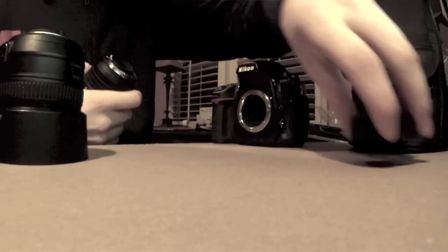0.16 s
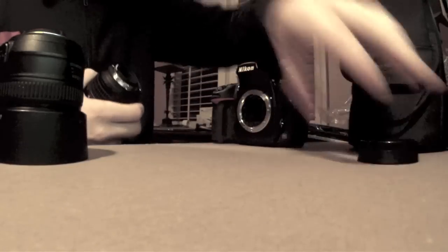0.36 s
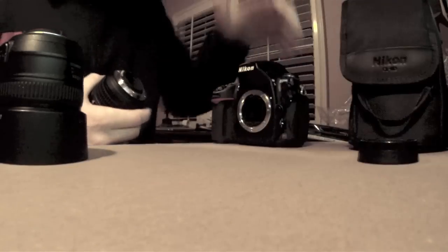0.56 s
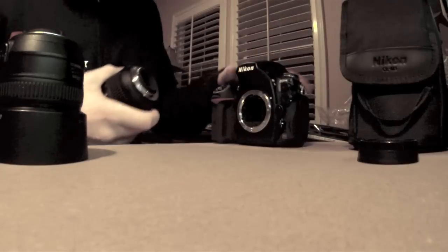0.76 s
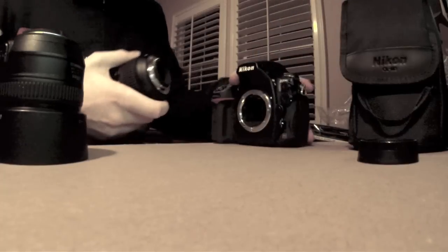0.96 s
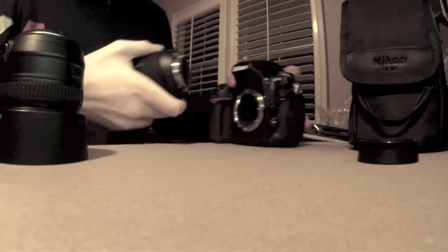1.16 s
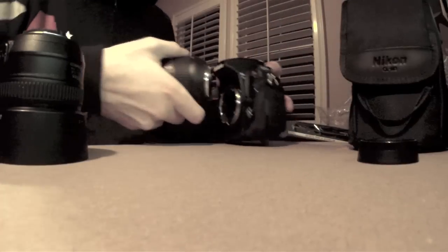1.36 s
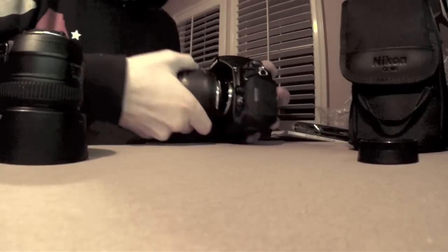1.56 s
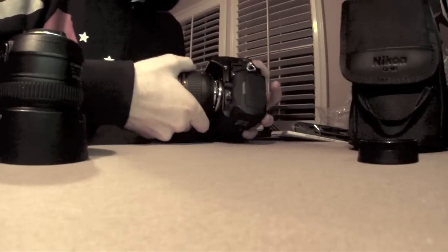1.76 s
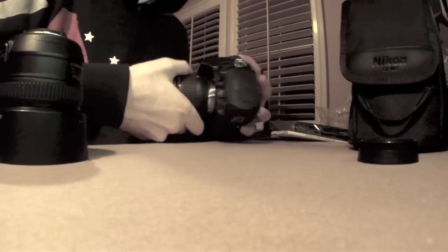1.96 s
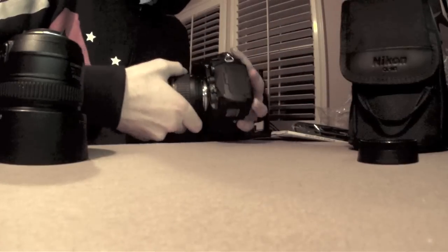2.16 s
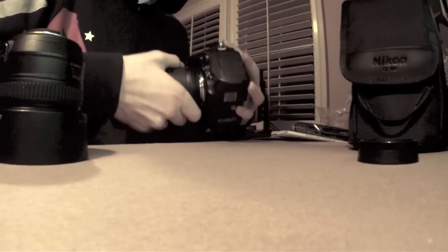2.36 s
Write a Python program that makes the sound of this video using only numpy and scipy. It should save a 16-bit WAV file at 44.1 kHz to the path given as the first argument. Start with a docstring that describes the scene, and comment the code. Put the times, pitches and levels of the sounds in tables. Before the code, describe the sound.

Camera handling: a plastic cap clacks sharply onto a desk with a brief ringing rim, hands rustle faintly, then a lens knocks, slides and clunks into place, close up in a small room with low-grade, gritty sound.

```python
"""Cap on a desk, lens into a camera

A plastic cap clatters down on a desk, its rim ringing; hands rustle, then a lens is knocked, slid and locked home.
Hits are decaying modes plus noise snaps; the rustle and slides are clumped grit over a desk rumble.
A small room answers the hits with sparse decaying taps; hum, hiss and low noise lie underneath.
The recorder samples at a low rate and holds each sample, which mirrors the sound into the treble.
"""
import sys
import numpy as np
from scipy import signal
from scipy.fft import rfft, irfft
from scipy.io import wavfile
from scipy.ndimage import uniform_filter1d

SR = 44100
rng = np.random.default_rng(int(sys.argv[2]) if len(sys.argv) > 2 else 0)


def gain_from_decibels(decibels):
    """Convert decibel values to linear amplitude factors."""
    exponent = np.asarray(decibels, float) / 20
    return 10 ** exponent


def digitize_waveform(pressure):
    """Quantize a signal to 16-bit integers and store it at the path in sys.argv[1].

    Rows of a 2-D input are taken as channels; values are limited to [-1, 1].
    """
    field = np.atleast_2d(pressure).T
    bounded = np.clip(field, -1, 1)
    quanta = np.round(bounded * 32767).astype(np.int16)
    wavfile.write(sys.argv[1], SR, quanta)


N = 105840

# Background colours, relative spectrum: hz, density_db (per Hz)
HISS_SPECTRUM = [(88, -25.5), (150, -12), (183, -1), (328, -5), (366, -4.5), (865, -13), (934, -15),
                 (4340, -27.5), (5900, -50), (7670, -61)]
LOW_SPECTRUM = [(15, -30.5), (30, 9.5), (60, -7.5), (100, -3.5), (150, -6), (200, -32.5)]
# Room decay by band: hz, t60_s
ROOM_DECAY = [(150, 0.17), (400, .3), (900, 0.31), (2000, 0.27), (5000, 0.28)]

# Cap meeting the desk, rim then flat, then a soft rock: start_s, clatter_db, rim_ring_db, rim_rise_s
CAP_HITS = [(0.2211, -7.5, -10, .0006), (0.2254, -2.5, -8, 0.00073), (0.278, -40.5, -34, 0.01)]
# Modes of the cap and the desk under it, then of its rim: hz, relative_db, t60_s
CAP_MODES = [(326, -4, 0.12), (604, -11, .05), (699, -2.5, 0.017), (856, -12.5, 0.04), (944, 8.5, 0.021),
             (1040, 3.5, 0.012), (1152, 0, 0.015), (1350, -12, 0.04), (2630, -1, .012), (3470, -15.5, 0.04)]
RIM_MODES = [(2436, 0, .105), (2441, -27, .4)]

# Rasp of the hands, then of the mount sliding twice, one list per stroke: time_s, rasp_db
RASP_STROKES = [
    [(.68, -72), (.71, -62), (.75, -60), (.85, -67), (.89, -48), (.92, -55), (.96, -65), (1.03, -81),
     (1.09, -60.5), (1.12, -50), (1.15, -54.5), (1.22, -55.5), (1.31, -58.5), (1.40, -64.5), (1.5, -72)],
    [(1.63, -81), (1.655, -56), (1.68, -38.5), (1.70, -42), (1.72, -60), (1.8, -79)],
    [(1.853, -48), (1.875, -57.5), (1.90, -54), (1.915, -54), (1.935, -29.5), (1.98, -50), (2.03, -63),
     (2.15, -62), (2.19, -65), (2.25, -70)],
]
# Body of the same strokes: time_s, scuff_db, rumble_db
SLIDE_STROKES = [
    [(0.66, -89, -60), (0.808, -58.5, -53), (0.912, -53, -65), (1.01, -68, -53.5), (1.208, -58.5, -44),
     (1.368, -65.5, -52.5), (1.5, -81, -57)],
    [(1.625, -41, -58), (1.8, -63, -61)],
    [(1.855, -52, -38), (1.907, -47.5, -37), (2.015, -28, -46), (2.057, -47, -38.5), (2.141, -49.5, -64),
     (2.25, -68, -70)],
]
# Colours of the strokes: hz, density_db (per Hz)
HAND_RASP = [(800, -15), (1300, -5), (2200, -4), (3000, -9.5), (4300, -6.5), (5300, -6), (6500, -13)]
MOUNT_RASP = [(1200, -6), (2400, -4), (3300, -3), (4500, 1.5), (5600, -7.5)]
SCUFF_SPECTRUM = [(120, -37), (200, -7.5), (404, 9.5), (467, -2), (1040, -1.5), (2000, -75), (2600, -65)]
RUMBLE_SPECTRUM = [(25, -35), (45, -2), (80, -1.5), (110, -12), (160, -47)]

# Lens against body, pitch set by the grip, thud through the desk:
# start_s, ring_db, pitch_ratio, hardness_db (per octave), crack_db, thud_db
KNOCKS = [(0.76, -42.5, 1.01, 9, -65, -78), (0.778, -38.5, 0.96, 8, -60, -33.5),
          (0.866, -48, 1.13, 23, -50, -58), (1.062, -50, 1.02, 15, -50.5, -60),
          (1.5655, -39, 1.2, 15, -35.5, -26), (1.569, -26, 0.84, -6, -38.5, -24.5),
          (1.6196, -13.5, 0.98, 7.5, -21.5, -56), (1.623, -14, 0.99, -4.5, -31, -33),
          (1.699, -24, 0.9, -6.5, -37.5, -45), (1.7055, -22, 0.89, -14, -37, -26),
          (1.872, -34, 0.83, -14, -58, -26.5), (1.9372, -9, 0.96, -2, -20, -23.5),
          (1.9465, -9.5, 0.75, -3, -15.5, -18.5), (1.952, -13.5, 0.814, 7, -30, -51),
          (1.9639, -12, 1.15, -6, -17.5, -19), (1.9781, -8.5, .93, 0.5, -20, -53),
          (2.11, -27, .82, -1, -46, -28), (2.264, -29.5, 0.99, 2.5, -46.5, -62),
          (2.3701, -32.5, 0.95, -3, -43, -57)]
# Modes of the camera body (hz before the pitch ratio) and of the desk: hz, relative_db, t60_s
BODY_MODES = [(358, -12, 0.044), (406.7, 10.5, 0.036), (512, -7.5, 0.054), (753, 5, 0.023),
              (950, 0.5, 0.029), (1330, -17, 0.031)]
DESK_MODES = [(65.9, -13, 0.059), (99.15, 3, 0.1), (218, -10, 0.053)]
# Small bright ticks of catches and fingers: start_s, level_db
TICKS = [(0.173, -45), (0.7035, -47), (0.7254, -44), (0.737, -44), (0.884, -42.5), (0.9056, -40),
         (1.0696, -41), (1.1426, -37), (1.6581, -31), (1.8608, -15), (2.1707, -42)]
# Colours of the crack and the tick: hz, density_db (per Hz)
CRACK_SPECTRUM = [(710, -4.5), (1200, -2.5), (1830, -1.5), (2850, -7), (4340, -7), (5900, -16),
                  (7670, -54.5)]
TICK_SPECTRUM = [(820, -53), (1400, -11.5), (2160, -8.5), (3350, 0), (4290, -2.5), (5390, 0.5), (5900, -7),
                 (7670, -47)]

THUD_LAG_S = 0.003  # the desk speaks just after the blow


def evened(x):
    """Scales to rms 1."""
    return x / np.sqrt(np.mean(x ** 2) + 1e-20)


def read(points, hz):
    """Reads a table on a log-frequency axis."""
    f, value = np.transpose(points)
    return np.interp(np.log(hz + 1), np.log(f + 1), value)


def add(mix, s, sound):
    """Mixes a sound in at time s."""
    part = mix[round(s * SR):][:len(sound)]
    part += sound[:len(part)]


def colour(x, spectrum):
    """Shapes x with a spectrum, then evens it to rms 1."""
    gain = gain_from_decibels(read(spectrum, np.fft.rfftfreq(len(x), 1 / SR)))
    return evened(irfft(rfft(x) * gain, len(x)))


def ring(modes, tilt_db=0., spread_db=0., rise_s=0.00061, pitch=1):
    """One blow on a set of modes, peak 1; a hard blow favours the high ones, the spot struck varies them."""
    t = np.arange(SR // 2) / SR
    luck = rng.standard_normal(len(modes))
    sound = np.zeros(len(t))
    for (hz, db, t60), spot in zip(modes, luck):
        octaves_up = np.log2(hz / modes[0][0])
        level_db = db + tilt_db * octaves_up + spread_db * spot
        sound += gain_from_decibels(level_db - 60 * t / t60) * np.sin(2 * np.pi * pitch * hz * t)
    sound = sound * (1 - np.exp(-t / rise_s)) ** 2
    return sound / np.abs(sound).max()


def snap(spectrum, t60, rise_s=0.00034):
    """A short burst of coloured noise with a fast rise and an exponential decay."""
    t = np.arange(4096) / SR
    noise = colour(rng.standard_normal(len(t)), spectrum)
    return noise * gain_from_decibels(-60 * t / t60) * (1 - np.exp(-t / rise_s))


def strokes(tables, layers):
    """Plays layers of noise along level curves, with short fades at the ends of each stroke."""
    t, out = np.arange(N) / SR, np.zeros(N)
    for stroke in tables:
        s, *levels = np.transpose(stroke)
        fade = np.clip(np.minimum(t - s[0], s[-1] - t) / 0.0098, 0, 1)
        for level_db, layer in zip(levels, layers):
            out += fade * gain_from_decibels(np.interp(t, s, level_db)) * layer
    return out


def background():
    """Steady hiss and low room noise, with a mains hum whose level wavers slightly."""
    hiss_db, low_db, hum_db = -58.5, -54, -50  # rms
    hum_hz, waver_depth = 117.7, 0.11
    waver = 1 + waver_depth * evened(uniform_filter1d(rng.standard_normal(N), size=4000))
    hum = np.sqrt(2) * waver * np.sin(2 * np.pi * (hum_hz * np.arange(N) / SR + rng.random()))
    hiss = colour(rng.standard_normal(N), HISS_SPECTRUM)
    low = colour(rng.standard_normal(N), LOW_SPECTRUM)
    return gain_from_decibels(hiss_db) * hiss + gain_from_decibels(low_db) * low + gain_from_decibels(hum_db) * hum


def room(x):
    """Sparse taps of random sign, each band dying at its own speed."""
    taps = np.zeros(SR)
    at = np.arange(200, SR - 20, 20)
    taps[at + rng.integers(0, 20, len(at))] = rng.choice([-1., 1.], len(at))
    hz, t, z = signal.stft(taps, SR, nperseg=512)
    decay = gain_from_decibels(-60 * t / read(ROOM_DECAY, hz)[:, None])
    tail = signal.istft(z * decay, SR, nperseg=512)[1]
    return signal.fftconvolve(x, tail / np.linalg.norm(tail))[:N]


def cap():
    """The cap clatters at each contact and thuds into the desk; returns that and the clear ring of its rim."""
    clatter, rim = np.zeros(N), np.zeros(N)
    for s, db, rim_db, rim_rise_s in CAP_HITS:
        add(clatter, s, gain_from_decibels(db) * ring(CAP_MODES, rise_s=0.00017))
        add(clatter, s, gain_from_decibels(db - 10.5) * snap(CRACK_SPECTRUM, 0.013))
        add(clatter, s + THUD_LAG_S, gain_from_decibels(db - 28) * ring(DESK_MODES, rise_s=0.0057))
        add(rim, s, gain_from_decibels(rim_db) * ring(RIM_MODES, rise_s=rim_rise_s))
    return clatter, rim


def clumped_grit():
    """Dense random clicks of uneven strength that bunch together as surfaces rub."""
    grit_per_s, grit_db, clump_db = 4000, 2.5, 2.2
    strength = gain_from_decibels(grit_db * np.minimum(rng.exponential(1, N), 5))
    present = rng.random(N) < grit_per_s / SR
    grit = strength * present * rng.choice([-1., 1.], N)
    return grit * gain_from_decibels(clump_db * evened(uniform_filter1d(rng.standard_normal(N), size=300)))


def sliding():
    """Hands and then the mount rasp and scuff on the same grit while the desk rumbles."""
    grit = clumped_grit()
    hands = strokes(RASP_STROKES[:1], [colour(grit, HAND_RASP)])
    mount_rasp = strokes(RASP_STROKES[1:], [colour(grit, MOUNT_RASP)])
    scuff = colour(grit, SCUFF_SPECTRUM)
    rumble = colour(rng.standard_normal(N), RUMBLE_SPECTRUM)
    return hands + mount_rasp + strokes(SLIDE_STROKES, [scuff, rumble])


def mount():
    """Knocks ring the camera body, crack and thud into the desk; ticks are bare snaps."""
    spot_db = 2  # spread of mode levels from blow to blow
    out = np.zeros(N)
    for s, ring_db, pitch, hard_db, crack_db, thud_db in KNOCKS:
        add(out, s, gain_from_decibels(ring_db) * ring(BODY_MODES, hard_db, spot_db, 0.0006, pitch))
        add(out, s, gain_from_decibels(crack_db) * snap(CRACK_SPECTRUM, t60=0.016))
        add(out, s + THUD_LAG_S, gain_from_decibels(thud_db) * ring(DESK_MODES, 0, spot_db, rise_s=0.0044))
    for s, db in TICKS:
        add(out, s, gain_from_decibels(db) * snap(TICK_SPECTRUM, t60=0.013, rise_s=0.00029))
    return out


def scene():
    """Hits with their room, sliding and background, as one channel."""
    clatter, rim = cap()
    hits = clatter + mount()
    echo = gain_from_decibels(-8.5) * room(hits + gain_from_decibels(-10) * rim)
    return (hits + rim + echo + sliding() + background())[None]


def low_pass(x):
    """Removes everything above the highest recorded frequency."""
    return signal.sosfilt(signal.butter(12, 16470, fs=SR, output="sos"), x)


def record(dry):
    """Band limits, low-rate sampling (mirrors about the sample rate), hold (a sinc droop), output filter."""
    bass_hz, cut_hz, cut_width_hz, top_hz = 40, 5620, 233, 15500
    sample_hz, mirror_db = 12000, 0.5
    hz = np.fft.rfftfreq(N, 1 / SR)
    low_cut = (1j * hz / (1j * hz + bass_hz)) ** 2
    high_cut = 1 / (1 + np.exp(np.clip((hz - cut_hz) / cut_width_hz, -50, 50)))
    limited = irfft(rfft(dry) * low_cut * high_cut, N)
    carrier = np.cos(2 * np.pi * sample_hz * np.arange(N) / SR)
    sampled = limited * (1 + 2 * gain_from_decibels(mirror_db) * carrier)
    hold = np.sinc(hz / sample_hz)
    output_filter = 1 / (1 + np.exp((hz - top_hz) / 150))
    finished = irfft(rfft(sampled) * hold * output_filter, N)
    return low_pass(finished)


dry = scene()
out = record(dry)
digitize_waveform(out)
```